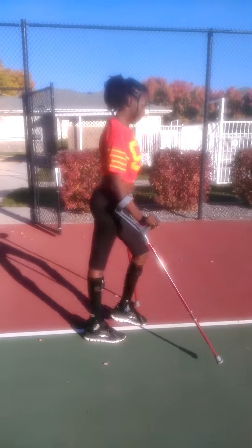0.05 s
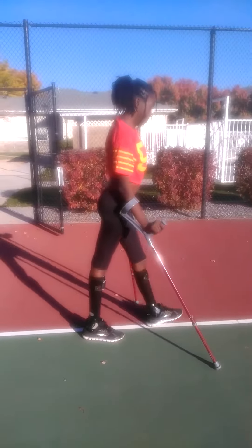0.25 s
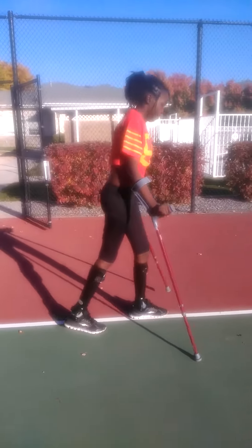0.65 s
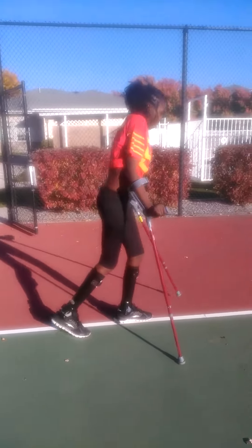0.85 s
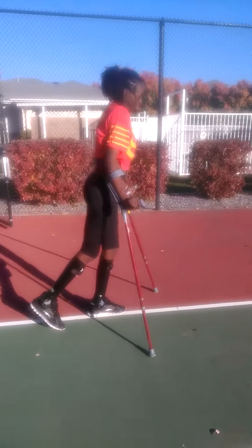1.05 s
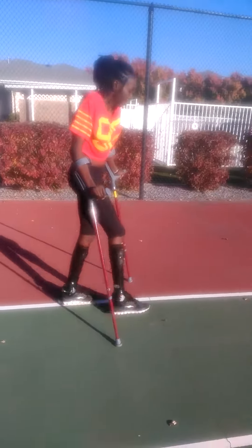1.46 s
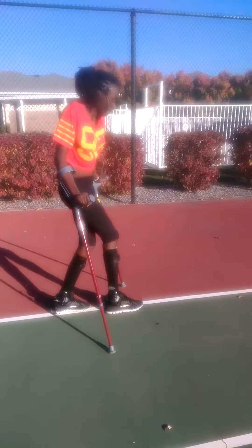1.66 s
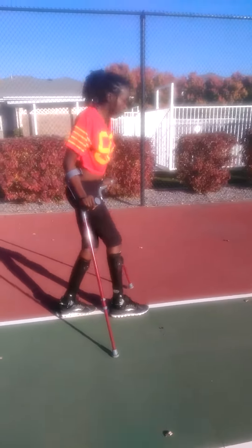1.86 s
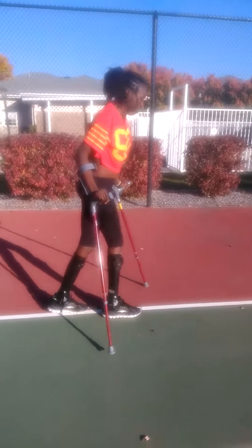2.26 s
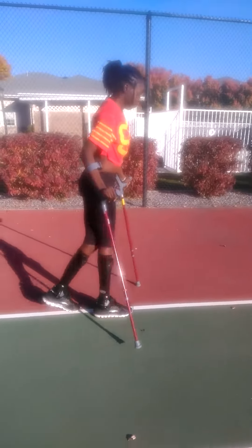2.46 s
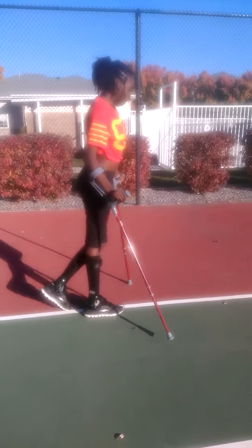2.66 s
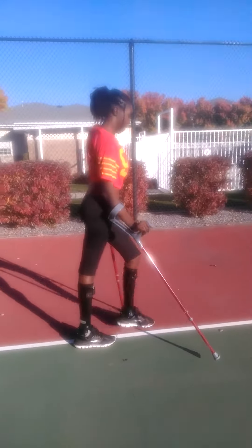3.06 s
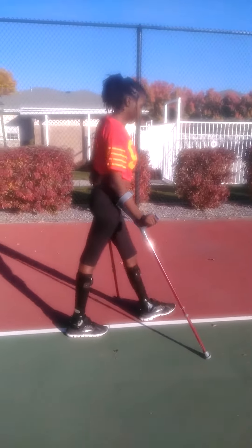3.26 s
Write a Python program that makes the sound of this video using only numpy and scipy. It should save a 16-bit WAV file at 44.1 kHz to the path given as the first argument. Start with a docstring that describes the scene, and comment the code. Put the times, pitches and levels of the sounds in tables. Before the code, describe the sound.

Metal crutches clack on an outdoor hard court, sharply at 0.4 seconds, then lightly around 0.8 and 1.1. A gritty scrape comes at 1.5, a soft rubber tip knock at 1.8, and further clacks at 2.2 and 3 seconds, with faint scuffs between. Wind thumps the microphone on the left, hardest from 0.4 to 1 second. A distant traffic hum drops at about 1.5 seconds.

```python
"""Far traffic hums and light wind bumps the left microphone port. Then someone crosses an outdoor
hard court on forearm crutches: loose metal tubes clack, tips and shoes scrape over grit, rubber
squeaks and knocks, and nearby walls add a short tail. Halfway through, the traffic drops in level;
later something hoots faintly far off."""
import sys
import numpy as np
from scipy import signal
from scipy.fft import rfft, irfft, next_fast_len
from scipy.io import wavfile
from scipy.ndimage import uniform_filter1d, map_coordinates

SR = 44100
rng = np.random.default_rng(int(sys.argv[2]) if len(sys.argv) > 2 else 0)


def store_pcm(level_fs):
    """Save levels as 16-bit WAV."""
    pcm = np.round(np.clip(level_fs, -1, 1) * 32767).astype(np.int16)
    wavfile.write(sys.argv[1], SR, np.atleast_2d(pcm).T)


N = 145530
T = np.arange(N) / SR

# stereo image of the noise beds and tail (frequency [Hz], left-right correlation [-1..1])
STEREO_LIKENESS = [(60, -0.53), (150, -0.82), (400, -0.83), (950, -0.44), (2400, -0.046), (6000, 0.097)]
# fader ride of the traffic and its rumble (time [s], level [dB])
TRAFFIC_RIDE = [(.08, -48.5), (1.51, -47.5), (1.58, -56), (2.45, -56.5), (2.88, -60), (3.05, -57),
                (3.3, -58.5)]
# far traffic hum (frequency [Hz], gain [dB])
TRAFFIC_EQ = [(100, 0), (300, 2), (560, -4.5), (900, 3), (1250, -2), (1700, -11), (2500, -16), (4500, -21),
              (8000, -26), (14000, -51.5)]
# low traffic rumble (frequency [Hz], gain [dB])
RUMBLE_EQ = [(20, -33), (45, -7), (65, 1.5), (130, -3.5), (250, -12.5), (450, -24), (1000, -53)]
# steady hiss (frequency [Hz], gain [dB])
HISS_EQ = [(300, 4), (2000, -13), (5000, -9.5), (7500, 1), (10000, 1.5), (12000, -3), (14000, -3)]
RUMBLE_BOOST_DB, HISS_DB, PATCHY_DB = 9, -61.5, 1.5

# gusts on the port (time [s], relative level [dB])
GUST_RIDE = [(.1, -48.5), (.35, -42), (.45, -32.5), (.62, -30), (.75, -32.5), (.95, -36), (1.04, -48),
             (1.3, -48), (1.42, -34.5), (1.6, -39.5), (1.78, -42), (2.12, -44.5), (2.26, -36),
             (2.38, -48.5), (2.66, -41), (2.78, -33), (2.92, -51.5), (3.08, -39), (3.28, -61)]
# boom of the buffeting (frequency [Hz], gain [dB])
GUST_EQ = [(20, -24), (35, -1), (55, 4), (80, -1.5), (130, -9.5), (250, -19.5), (400, -33.5), (1000, -51)]
GUST_TRIM_DB, GUST_RIGHT_DB, LUMP_DB = 1.5, -18.5, 2.5
# eddies that bump the left port (time [s], level [dB], starting pitch [Hz])
EDDIES = [(0.384, -22, 76), (.458, -13, 76.4), (.544, -18.5, 190), (.562, -23, 88), (.592, -12.5, 129),
          (.639, -15, 82), (.655, -20, 80), (.69, -23, 90), (.797, -15.5, 85), (0.833, -14.5, 81),
          (.932, -18.5, 95), (.966, -22.5, 66), (1.388, -21, 126), (1.456, -22, 116), (1.645, -18, 71),
          (1.904, -26.5, 122), (1.981, -16.5, 135), (2.474, -12, 65), (2.721, -18, 105), (2.914, -41, 150)]
EDDY_RISE_CYCLES, EDDY_SAG = 0.5, 0.24
POP_S, POP_DB, POP_DECAY_S = .8026, -16, 0.0011

# hits inside the crutches (time [s], level [dB], brightness [Hz], left over right [dB], crutch [0, 1])
TUBE_HITS = [(0.3642, -15, 7000, 3, 0), (.3658, -20, 5500, 10, 0), (0.3672, -18, 2800, 6, 0),
             (0.7748, -38, 4000, 5, 1), (1.124, -39, 6000, 5.5, 1), (2.099, -52, 3500, 12.5, 0),
             (2.157, -29, 7500, -8, 1), (2.1616, -38, 4530, -6, 1), (3.0226, -26, 11000, -6, 1),
             (3.0233, -27, 9000, -7, 1), (3.0275, -42, 3500, -10, 1)]
# tube modes, one list per crutch (frequency [Hz], level [dB], t60 [s])
TUBE_MODES = [
    [(2150, -4, .026), (2300, -4, 0.016), (2480, -2, 0.019), (3000, -13, .014), (3600, -17, .014),
     (4330, -13, 0.023), (4700, -11, .016), (5530, -4, 0.013), (6140, -2.5, .016), (6490, -4, 0.013),
     (7200, -12, .012), (8090, -6.5, .011), (9550, -5, .01), (10760, -8, 0.0072)],
    [(2370, -6, 0.015), (3860, -10.5, 0.019), (4440, -5.5, 0.012), (5470, -6, 0.011), (6590, 1, 0.008),
     (7930, -2.5, 0.008), (8400, -6.5, 0.0069), (10020, -7.5, 0.0091), (11600, -7, .007), (12600, -9, .006)],
]
# metal-on-metal transient (frequency [Hz], gain [dB])
CRACK_EQ = [(300, -25), (1400, -22), (2200, -1), (7000, -3), (11000, 1), (14000, -4)]
CRACK_DB, CRACK_T60_S, CLACK_OCTAVES, CLACK_ATTACK_S = -6, 0.006, 1.22, .0001
# tone of the walls' tail (frequency [Hz], gain [dB])
TAIL_EQ = [(300, -18), (1200, 1), (2400, 4.5), (6000, 3), (9500, -5.5), (14000, -19)]
COURT_DB, COURT_PREDELAY_S, COURT_T60_S = -20, .016, 0.32

# a tip or sole drags (time [s], length [s], level [dB], tilt [dB/octave], left over right [dB])
DRAGS = [(1.012, .014, -56, -10, 11.5), (1.205, 0.021, -57.5, -8, 7), (1.4658, 0.062, -31.5, -0.5, 6),
         (1.828, 0.0042, -41, -1, 5.5), (1.838, 0.0082, -48.5, -9, 6), (2.025, 0.014, -55, -8.5, 11.5),
         (2.048, 0.036, -59, -8.5, 9.5), (2.5, .015, -59, -11, 5), (3.262, .035, -63.5, 13, 11)]
# rasp of the grit (frequency [Hz], gain [dB])
GRIT_EQ = [(400, -24), (1600, -17), (2150, -6.5), (2460, -14.5), (2780, -1), (3300, -14), (3700, -5.5),
           (4300, -2), (5000, -5.5), (5600, -1.5), (6800, -2), (7800, -5.5), (9000, -0.5), (9900, 4),
           (10900, -0.5), (11800, -13), (13100, -5), (14000, -13.5)]
SCRAPE_ATTACK_S, SCRAPE_T60_S, GRAINS_PER_S, GRAIN_DB = 0.0026, 0.052, 1500, -4
CHATTER_DB, CHATTER_PER_S = 1.6, 320
# rubber slips (time [s], length [s], pitch [Hz], level [dB])
SLIPS = [(1.605, 0.0085, 2150, -51), (2.185, 0.014, 2950, -59), (2.202, 0.017, 2700, -56),
         (2.998, 0.013, 3050, -53)]
SQUEAK_WIDTH = 0.091  # fraction of the pitch

# a rubber tip lands (time [s], level [dB], relative shaft level [dB])
LANDINGS = [(1.838, -41, -0.5), (3.023, -45.5, -18)]
# dull knock of the tip (frequency [Hz], gain [dB])
KNOCK_EQ = [(100, -11), (330, -2), (480, -1), (700, -14), (1200, -22), (3000, -43)]
# shaft modes (frequency [Hz], level [dB], t60 [s])
SHAFT_MODES = [(1916, -0.5, 0.052), (2884, -1, 0.048), (3630, -4, 0.047)]
KNOCK_ATTACK_S, KNOCK_T60_S = 0.00089, 0.069

# faint far hoots (time [s], length [s], pitch [Hz], level [dB])
FAR_HOOTS = [(2.138, 0.12, 459, -60), (2.493, 0.11, 400, -63.5), (2.716, 0.21, 449, -66),
             (3.083, .11, 465, -62.5)]
HOOT_WAVER = .025  # fraction of the pitch
START_S, LOW_CUT_HZ, TOP_HZ = .081, 37, 14500
PORT_LEAD_S, PHASE_SCATTER_RAD = .000025, .6


def amp(db):
    """Decibels to gain."""
    return 10 ** (np.asarray(db) / 20)


def unit(x):
    """Scale to rms 1."""
    return x / np.sqrt(np.mean(x ** 2) + 1e-20)


def along(points, hz):
    """Read (frequency [Hz], value) points on a log axis."""
    f, v = np.transpose(points)
    return np.interp(np.log(hz + 1), np.log(f + 1), v)


def ride(rows):
    """A fader curve through (time [s], value) points."""
    return np.interp(T, *np.transpose(rows))


def wobble(rate):
    """A smooth random curve, rate knots a second."""
    return map_coordinates(rng.standard_normal(int(N * rate / SR) + 4), [T * rate])


def pan(db):
    """Stereo gains, left louder by db."""
    return amp(np.array([[db / 2], [-db / 2]]))


def filtered(x, response):
    """EQ x with a gain that is a function of frequency."""
    n = x.shape[-1]
    padded = next_fast_len(n + 8192)
    return irfft(rfft(x, padded) * response(np.fft.rfftfreq(padded, 1 / SR)), padded)[..., :n]


def high_pass(x, hz):
    """Third-order low cut."""
    return signal.sosfilt(signal.butter(3, hz, "high", fs=SR, output="sos"), x)


def add(out, s, x):
    """Mix x into out from time s."""
    i = round(s * SR)
    out[..., i:i + x.shape[-1]] += x[..., :N - i]


def burst(t, response):
    """Wide, filtered noise of rms 1, as long as t."""
    return unit(filtered(rng.standard_normal((2, len(t))), response))


def noise_bed(eq):
    """Coloured mid-side noise of rms 1 whose width varies with frequency."""
    def response(hz):
        width = np.arccos(np.clip(along(STEREO_LIKENESS, hz), -1, 1)) / 2
        return amp(along(eq, hz)) * [np.cos(width), np.sin(width)]
    mid, side = filtered(rng.standard_normal((2, N)), response)
    return unit(np.array([mid + side, mid - side]))


def patchy(x):
    """Moving air gives distant sound patches of random gain."""
    spectrum = signal.stft(x, nperseg=1024)[2]
    patches = uniform_filter1d(rng.standard_normal(spectrum.shape[1:]), size=4, axis=0)
    patches = uniform_filter1d(patches, size=9, axis=1)
    return unit(signal.istft(spectrum * amp(PATCHY_DB * unit(patches)), nperseg=1024)[1][:, :N])


def traffic():
    """Far hum and rumble ride one fader, over an even hiss."""
    level_db = ride(TRAFFIC_RIDE)
    hum = patchy(noise_bed(TRAFFIC_EQ)) * pan(db=6.5) * amp(level_db + 0.92 * wobble(9))
    rumble = patchy(noise_bed(RUMBLE_EQ)) * pan(db=4) * amp(level_db + RUMBLE_BOOST_DB)
    hiss = noise_bed(HISS_EQ) * pan(db=1) * amp(HISS_DB)
    return hum + rumble + hiss


def wind():
    """Lumpy gusts hit mostly the left port; eddies push it for a cycle or two, and it pops once."""
    lumps = unit(noise_bed(GUST_EQ) * amp(LUMP_DB * wobble(22.003)))
    out = lumps * amp(ride(GUST_RIDE) + GUST_TRIM_DB) * amp([[0], [GUST_RIGHT_DB]])
    t = np.arange(SR // 8) / SR
    for s, db, hz in EDDIES:
        rise = hz * t / EDDY_RISE_CYCLES
        swell = (rise * np.exp(1 - rise)) ** 2
        cycles = np.log1p(EDDY_SAG * hz * t) / EDDY_SAG  # the pitch droops
        add(out[0], s, amp(db) * swell * np.sin(2 * np.pi * cycles))
    add(out[0], POP_S, amp(POP_DB) * np.exp(-t / POP_DECAY_S))
    return out


def ring(modes, t, weight=np.ones_like):
    """Struck modes ring out; the left port hears them a little earlier."""
    hz, db, t60 = np.transpose(modes)[:, :, None]
    lead = np.array([PORT_LEAD_S, 0])[:, None, None]
    phase = 2 * np.pi * hz * (t + lead) + PHASE_SCATTER_RAD * rng.standard_normal((2, len(modes), 1))
    return (weight(hz) * amp(db - 60 * t / t60) * np.sin(phase)).sum(axis=1)


def clacks():
    """Each hit cracks and briefly rings its tube; the thin metal radiates no bass."""
    out, t = np.zeros((2, N)), np.arange(SR // 16) / SR
    attack = 1 - np.exp(-t / CLACK_ATTACK_S)
    for s, db, centre_hz, pan_db, crutch in TUBE_HITS:
        bright = lambda f: 1 / (1 + (np.log2((f + 1) / centre_hz) / CLACK_OCTAVES) ** 2)
        crack = burst(t, lambda f: amp(along(CRACK_EQ, f)) * bright(f))
        crack *= amp(CRACK_DB - 60 * t / CRACK_T60_S)
        tube = ring(TUBE_MODES[round(crutch)], t, bright)
        add(out, s, amp(db) * pan(pan_db) * (tube + crack) * attack)
    return high_pass(out, hz=1850)


def court_tail(x):
    """Walls and fence scatter x into a diffuse tail: noise that follows its fading power."""
    t = np.arange(SR // 2) / SR
    decay = amp(-60 * t / COURT_T60_S) ** 2
    power = np.abs(signal.fftconvolve((x ** 2).mean(axis=0), decay / decay.sum()))[:N]
    out = np.zeros((2, N))
    add(out, COURT_PREDELAY_S, noise_bed(TAIL_EQ) * np.sqrt(power))
    return out * pan(db=3)


def scrapes():
    """A tip or sole drags over dense grains of grit in abrupt, chattering strokes."""
    out, t = np.zeros((2, N)), np.arange(SR // 5) / SR
    octaves_up = lambda f: np.log2(np.maximum(f, 1000) / 1000)
    for s, length, db, tilt_db, pan_db in DRAGS:
        grains = (rng.random(len(t)) < GRAINS_PER_S / SR) * rng.standard_normal((2, len(t)))
        rub = rng.standard_normal((2, len(t))) + amp(GRAIN_DB) * unit(grains)
        grit = unit(filtered(rub, lambda f: amp(along(GRIT_EQ, f) + tilt_db * octaves_up(f))))
        attack = np.minimum(t / SCRAPE_ATTACK_S, 1)
        release = amp(-60 * np.maximum(t - length, 0) / SCRAPE_T60_S)
        add(out, s, amp(db) * pan(pan_db) * attack * release * grit)
    return out * amp(CHATTER_DB * wobble(CHATTER_PER_S))


def squeaks():
    """Rubber slips for an instant: a blip of narrow-band noise."""
    out, t = np.zeros((2, N)), np.arange(SR // 20) / SR
    for s, length, hz, db in SLIPS:
        slip = burst(t, lambda f: 1 / (1 + ((f / hz - 1) / SQUEAK_WIDTH) ** 2))
        swell = np.sin(np.pi * np.minimum(t / length, 1))
        add(out, s, amp(db) * pan(db=8.5) * slip * swell)
    return out


def tip_knocks():
    """The rubber tip lands with a dull knock and shakes the shaft."""
    out, t = np.zeros((2, N)), np.arange(SR // 6) / SR
    attack = 1 - np.exp(-t / KNOCK_ATTACK_S)
    for s, db, shaft_db in LANDINGS:
        knock = burst(t, lambda f: amp(along(KNOCK_EQ, f))) * amp(-60 * t / KNOCK_T60_S)
        shaft = amp(shaft_db) * ring(SHAFT_MODES, t)
        add(out, s, amp(db) * pan(db=3.5) * (knock + shaft) * attack)
    return out


def hoots():
    """Soft, wavering tones at the edge of hearing."""
    out, waver = np.zeros(N), 1 + HOOT_WAVER * wobble(60)
    for s, length, hz, db in FAR_HOOTS:
        swell = np.sin(np.pi * np.clip((T - s) / length, 0, 1))
        out += amp(db) * swell * np.sin(2 * np.pi * hz * np.cumsum(waver) / SR)
    return out * pan(db=7)


def scene():
    """The mix: only the walker feeds the court's tail."""
    walker = clacks() + tip_knocks() + scrapes() + squeaks()
    return walker + amp(COURT_DB) * court_tail(walker) + wind() + traffic() + hoots()


def record(dry):
    """Open after a moment of silence; trim the deepest bass and the top treble."""
    return filtered(high_pass(dry * (T > START_S), LOW_CUT_HZ), lambda hz: hz < TOP_HZ)


dry = scene()
out = record(dry)
store_pcm(out)
```